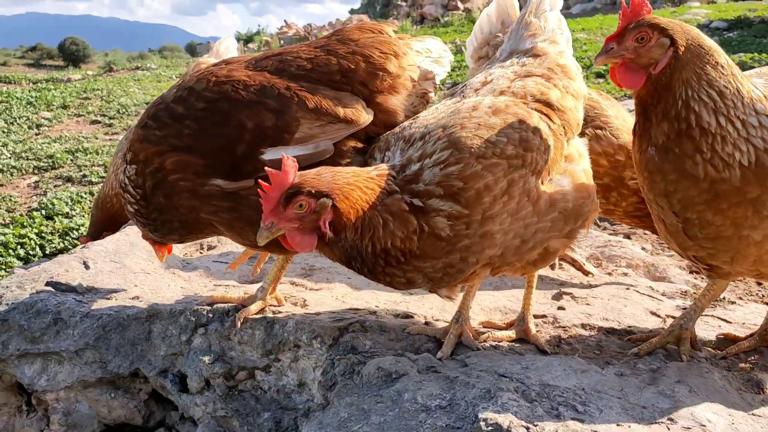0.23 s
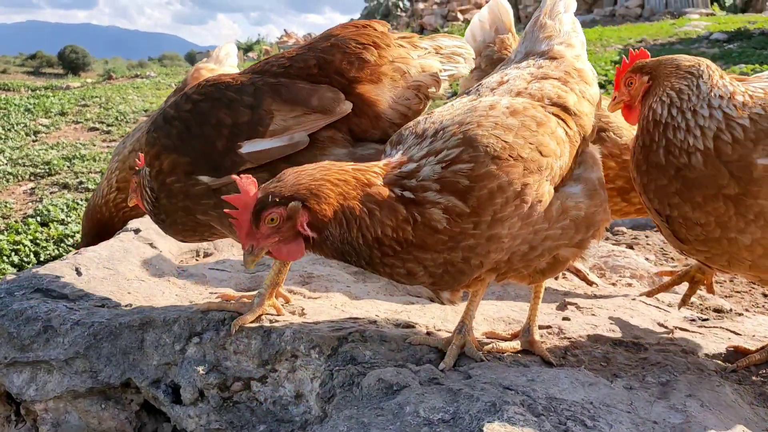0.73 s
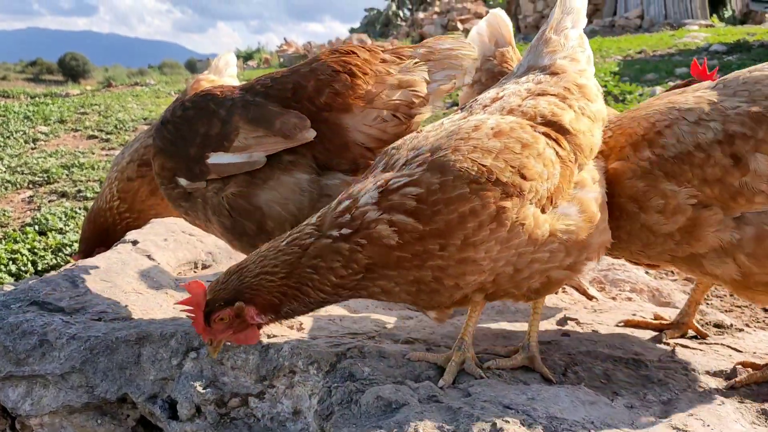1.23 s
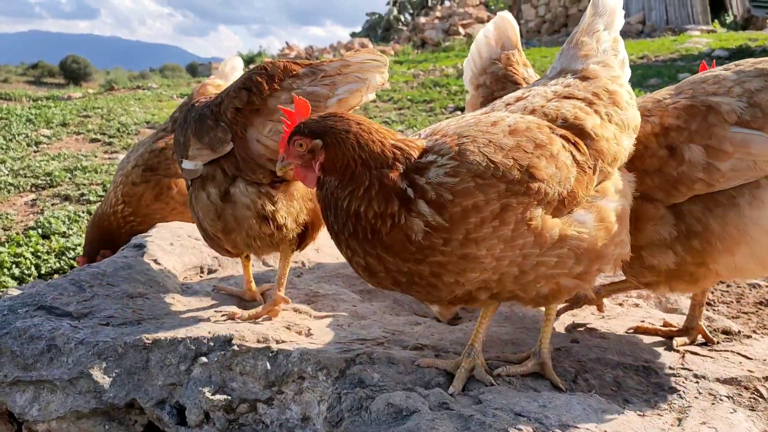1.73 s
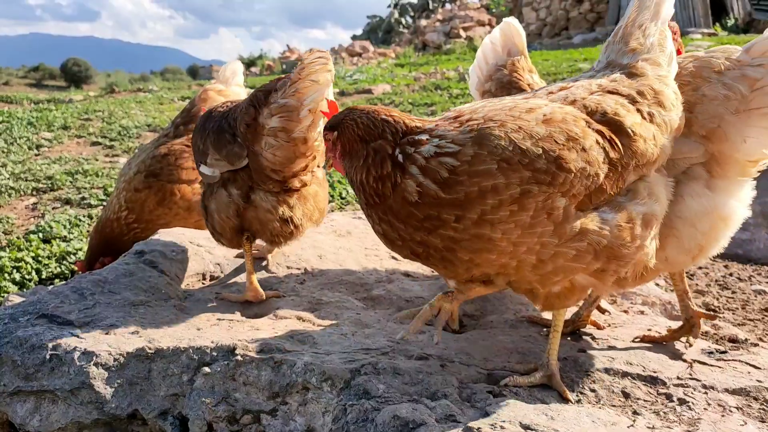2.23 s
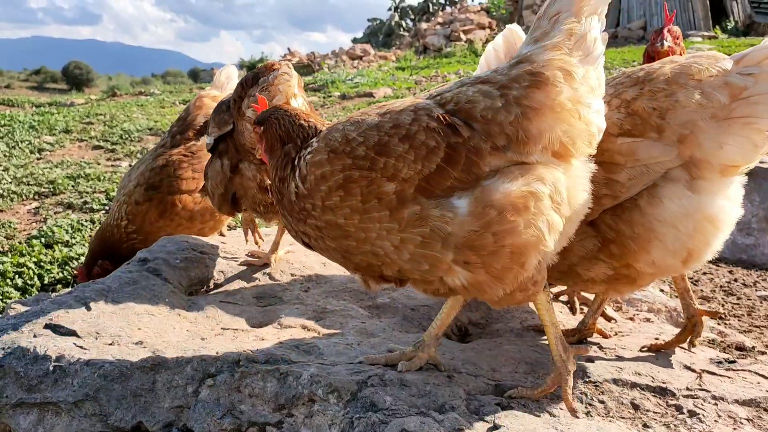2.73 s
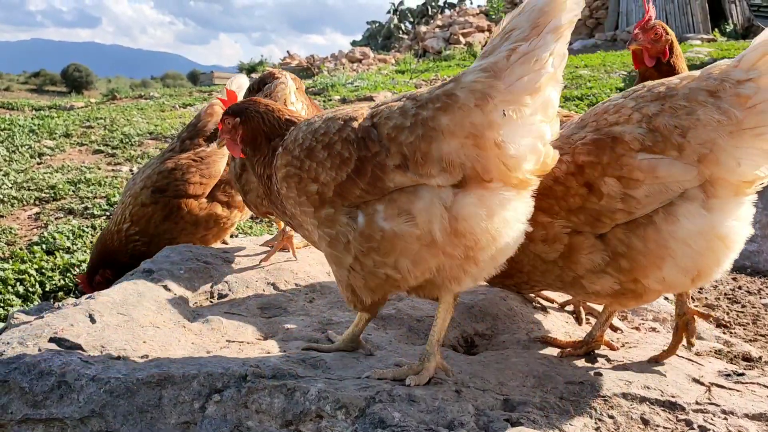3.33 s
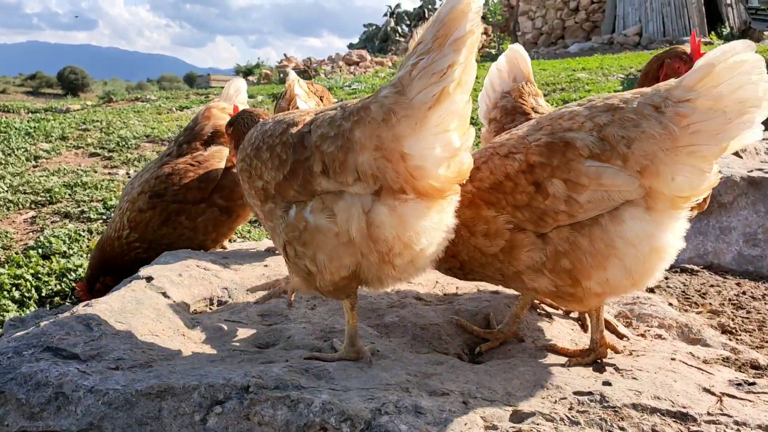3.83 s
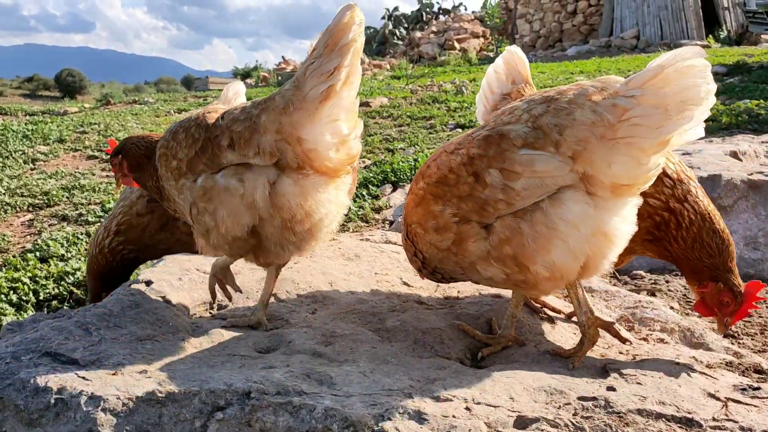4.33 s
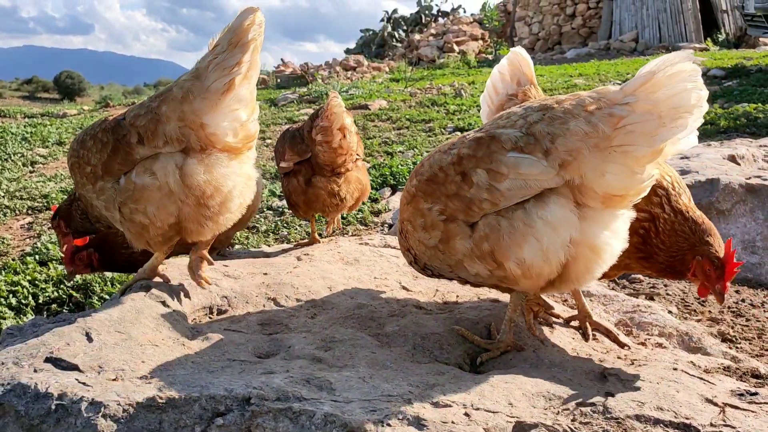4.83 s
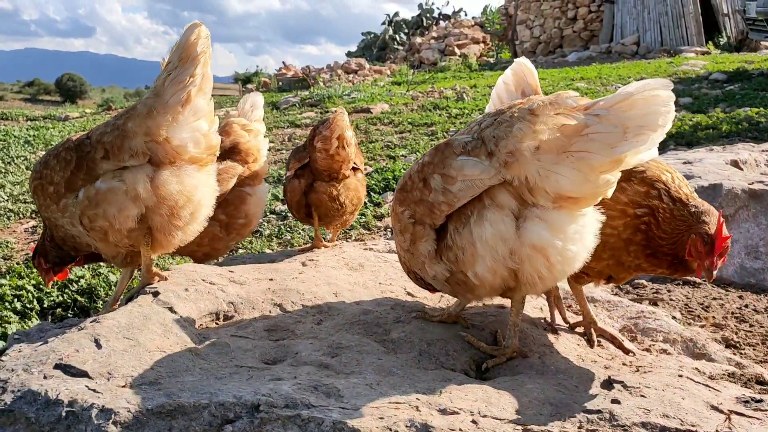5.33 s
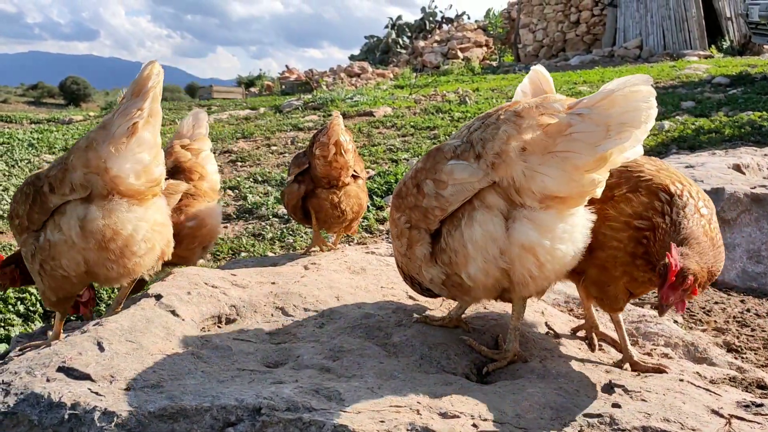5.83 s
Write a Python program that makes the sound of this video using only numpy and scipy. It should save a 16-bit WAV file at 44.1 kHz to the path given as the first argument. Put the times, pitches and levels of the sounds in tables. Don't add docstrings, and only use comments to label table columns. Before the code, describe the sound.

Brown hens moan, cluck and coo close by on bare rock, with claw ticks, low wind buffeting and thin far birdsong around them.

```python
import sys
import numpy as np
from scipy import signal
from scipy.fft import rfft, irfft, next_fast_len
from scipy.io import wavfile
from scipy.ndimage import uniform_filter1d, map_coordinates

SR = 44100
rng = np.random.default_rng(int(sys.argv[2]) if len(sys.argv) > 2 else 0)


def wav_out(sig):
    wavfile.write(sys.argv[1], SR, np.round(np.clip(np.atleast_2d(sig).T, -1, 1) * 32767).astype(np.int16))


def linear_from_db(decibels):
    return 10 ** (np.asarray(decibels, float) / 20)


N = 267687
T = np.arange(N) / SR


def unit(x):
    return x / np.sqrt(np.mean(x ** 2) + 1e-20)


def along(points, hz):
    point_hz, value = np.transpose(points)
    return np.interp(np.log(hz + 1), np.log(point_hz + 1), value)


def wobble(rate_hz, size=N):
    knots = rng.standard_normal(int(size * rate_hz / SR) + 4)
    return map_coordinates(knots, [np.arange(size) * rate_hz / SR])


def filtered(x, response):
    size = next_fast_len(x.shape[-1] + 8192)
    spectrum = rfft(x, size) * response(np.fft.rfftfreq(size, 1 / SR))
    return irfft(spectrum, size)[..., :x.shape[-1]]


def add(out, start_s, sound, pan_db):
    part = out[:, round(start_s * SR):][:, :len(sound)]
    part += linear_from_db([[pan_db / 2], [-pan_db / 2]]) * sound[:part.shape[1]]


def swell(start_s, length_s, power):
    return np.clip(1 - (2 * (T - start_s) / length_s - 1) ** power, 0, 1)


def smeared(sound, decay_s, tail_s, gap_s=0):
    t = np.arange(round(tail_s * SR)) / SR
    tail = rng.standard_normal((2, len(t))) * linear_from_db(-60 * t / decay_s) * (t >= gap_s)
    return signal.fftconvolve(sound, tail / np.linalg.norm(tail[0]), axes=1)[:, :N]


# hz [Hz], likeness [0-1]
LIKENESS = [(100, 1), (500, 0.76), (1000, 0.19), (2000, 0.24), (5000, 0.84), (9000, 0.35), (13000, 0.055)]


def rush(spectrum, patchy_db):
    z = signal.stft(rng.standard_normal((2, N)), nperseg=512)[2]
    patches = uniform_filter1d(rng.standard_normal(z.shape[1:]), size=6, axis=0)
    patches = uniform_filter1d(patches, size=10, axis=1)
    pair = signal.istft(z * linear_from_db(patchy_db * unit(patches)), nperseg=512)[1][:, :N]
    closed = [(spectrum[0][0] / 2, -90)] + list(spectrum) + [(spectrum[-1][0] * 2, -90)]

    def mid_side(hz):
        turn = np.arccos(np.clip(along(LIKENESS, hz), -1, 1)) / 2
        return linear_from_db(along(closed, hz)) * [np.cos(turn), np.sin(turn)]

    mid, side = filtered(pair, mid_side)
    return unit(np.array([mid + side, mid - side]))


# hz [Hz], level_db [dB per Hz]
AIR_SPECTRUM = [(71, -30), (120, -5), (300, -7), (500, 0), (1800, -3), (4320, -8.5), (5630, -3),
                (8640, -18.5), (15200, -13)]


def still_air():
    return linear_from_db(-72.5) * rush(AIR_SPECTRUM, patchy_db=1.4)


# hz [Hz], level_db [dB per Hz]
INSECT_SPECTRUM = [(4000, -30), (4800, -7), (5600, 0), (6300, -6), (7200, -30)]
# start_s [s], length_s [s], level_db [dB]
INSECT_SWELLS = [
    (1.877, 0.047, -65),
    (1.932, 0.029, -65),
    (1.9, 1.41, -77.5),
    (4.352, 0.13, -78),
    (5.164, 0.12, -72),
    (5.196, 0.86, -81),
]


def insects():
    level = np.full(N, linear_from_db(-81))
    for start_s, length_s, level_db in INSECT_SWELLS:
        level += linear_from_db(level_db) * swell(start_s, length_s, 4)
    return level * linear_from_db(2.5 * wobble(90)) * rush(INSECT_SPECTRUM, patchy_db=1.2) * linear_from_db([[1.6], [-1.6]])


# hz [Hz], level_db [dB per Hz]
SCRATCH_SPECTRUM = [(1300, -22), (2500, -11), (3500, 0), (4600, -3), (6000, -18)]
# hz [Hz], level_db [dB per Hz]
RUSTLE_SPECTRUM = [(2500, -24), (4500, -1.5), (7000, -2.5), (9000, -10), (15500, -4.5)]
# start_s [s], length_s [s], scratch_db [dB], rustle_db [dB]
STROKES = [(0.105, 0.13, -79, -69.5), (1.332, 0.16, -77, -84), (1.875, 0.04, -74, -95),
           (1.925, .04, -72, -95), (2.01, 0.06, -63, -82), (2.05, .09, -66, -79), (2.27, .06, -74, -90),
           (3.12, .08, -76, -95), (.255, .06, -78, -95), (.41, .05, -78, -95), (2.89, 0.34, -78.5, -94.5),
           (2.778, .07, -69.5, -83), (4.84, 0.11, -83, -78), (5.176, 0.078, -79, -81),
           (5.568, 0.039, -86, -71)]


def scuffs():
    levels = np.ones((2, N)) * linear_from_db([[-84], [-90]])
    for start_s, length_s, scratch_db, rustle_db in STROKES:
        levels += swell(start_s, length_s, 2) * linear_from_db([[scratch_db], [rustle_db]])
    scratch = levels[0] * linear_from_db(2.2 * wobble(90)) * rush(SCRATCH_SPECTRUM, patchy_db=3.0)
    rustle = levels[1] * linear_from_db(.8 * wobble(60)) * rush(RUSTLE_SPECTRUM, patchy_db=.5)
    return scratch + rustle


# hz [Hz], level_db [dB per Hz]
RUMBLE_SPECTRUM = [(8.8, -42.5), (15, -8), (38, 0), (59, 2.5), (129, -15), (161, -25), (270, -30),
                   (570, -120)]
# peak_s [s], peak_db [dB], ebb_db_per_s [dB/s]
GUST_PEAKS = [(0.04, -49, 250), (.17, -67, 100), (.37, -70, 150), (.6, -76, 20), (.84, -75, 100),
              (1.06, -74, 60), (1.23, -72, 100), (1.405, -50, 200), (1.49, -60, 80), (1.6, -53, 50),
              (1.73, -57, 150), (1.83, -57, 120), (2.0, -64, 80), (2.17, -63, 90), (2.49, -53, 150),
              (2.7, -62, 100), (2.85, -59, 80), (2.96, -65, 300), (3.15, -63, 50), (3.31, -63, 100),
              (3.4, -58, 200), (3.55, -67, 100), (3.77, -68, 30), (3.96, -68, 60), (4.07, -62, 100),
              (4.12, -59, 300), (4.31, -69, 100), (4.7, -70, 150), (4.92, -67, 100), (5.19, -73, 200),
              (5.36, -72, 100), (5.46, -62, 90), (5.58, -64, 70), (5.85, -72, 60), (5.99, -72, 150)]


def wind():
    rise_db_per_s, lull_db, steady_s = 330, -88, .05
    gusts_db = np.full(N, -np.inf)
    for peak_s, peak_db, ebb_db_per_s in GUST_PEAKS:
        loss_db = np.where(T < peak_s, rise_db_per_s * (peak_s - T), ebb_db_per_s * (T - peak_s))
        gusts_db = np.maximum(gusts_db, peak_db - loss_db)
    buffet = rush(RUMBLE_SPECTRUM, patchy_db=1.0)
    power = uniform_filter1d(buffet.mean(0) ** 2, size=round(steady_s * SR))
    strength = np.sqrt(np.abs(power) + .05)
    lumps = unit(linear_from_db(2.2 * wobble(14)) * buffet / strength ** .7)
    return (linear_from_db(gusts_db - 1.5) + linear_from_db(lull_db)) * lumps


# hz [Hz], level_db [dB]
KNOCK_SPECTRUM = [(330, -49), (480, 4), (750, -2.5), (1130, -14.5), (1300, -50)]


def knock():
    impulse = np.zeros(N)
    impulse[round(.02 * SR)] = 1
    sound = filtered(impulse, lambda hz: linear_from_db(along(KNOCK_SPECTRUM, hz)))
    return np.tile(linear_from_db(-31.5) * sound / sound.max(), (2, 1))


# start_s [s], peak_db [dB], low_part_db [dB]
CLAW_TICKS = [(0.2037, -53.5, 1), (0.972, -59.5, -43), (1.3936, -55.5, -8), (1.6334, -55, 7),
              (1.7984, -60.5, -9), (2.6842, -55.5, -2), (2.801, -43.5, -6), (2.8138, -46.5, -7),
              (2.829, -46.5, -9), (2.8575, -55, 6), (4.8876, -61.5, -22), (4.9252, -52.5, -13),
              (5.1866, -56.5, -6), (5.1953, -54, -20), (5.2053, -58, -20), (5.217, -55, -15),
              (2.637, -60, 5), (5.6082, -62, -8)]


def claws():
    out, t = np.zeros((2, N)), np.arange(SR // 20) / SR
    for start_s, peak_db, low_db in CLAW_TICKS:
        noise = rng.standard_normal(len(t)) * linear_from_db(-60 * t / 0.0087)
        colour = [(1200, low_db - 1.0), (3500, low_db + 4), (5500, 13), (9000, -5), (15000, -18.0)]
        crack = filtered(noise, lambda hz: linear_from_db(along(colour, hz)))
        add(out, start_s, linear_from_db(peak_db + 3.5) * crack / np.abs(crack).max(), pan_db=6.0 + 2 * rng.normal())
    return out


# start_s [s], peak_db [dB], top_hz [Hz]
FOOTFALLS = [
    (4.894, -60, 328),
    (4.908, -58, 240),
    (4.928, -61, 298),
    (4.99, -65, 300),
    (2.49, -60, 260),
    (4.455, -68, 600),
    (5.206, -55.5, 1120),
    (5.555, -65, 1300),
    (5.94, -60.5, 880),
]


def footfalls():
    out, t = np.zeros((2, N)), np.arange(SR // 20) / SR
    for start_s, peak_db, top_hz in FOOTFALLS:
        noise = rng.standard_normal(len(t)) * linear_from_db(-60 * t / .05)
        thud = signal.sosfilt(signal.butter(3, top_hz, fs=SR, output="sos"), noise)
        add(out, start_s - .006, linear_from_db(peak_db) * thud / np.abs(thud).max(), pan_db=1.0)
    return out


def note(length_s, first_hz, middle_hz, last_hz, overtone_db, rough, flutter_hz):
    u = np.linspace(-1, 1, round(length_s * SR))
    bend_hz = (first_hz + last_hz) / 2 - middle_hz
    pitch_hz = middle_hz + (last_hz - first_hz) / 2 * u + bend_hz * u * u
    trill = np.sin(np.pi * flutter_hz * length_s * u)
    unsteady = 1 + rough * (0.032 * trill + .035 * wobble(270, size=len(u)))
    phase = 2 * np.pi * np.cumsum(pitch_hz * unsteady) / SR
    overtone = linear_from_db(overtone_db) * np.exp(-(pitch_hz / 620) ** 8) * np.sin(2 * phase)
    return (1 - u ** 4) * (1 - 0.68 * rough * trill) * (np.sin(phase) + overtone)


# start_s [s], length_s [s], middle_hz [Hz], level_db [dB]
FALLING = [(2.432, .028, 2000, -67), (2.378, .015, 2950, -74), (2.385, .014, 1950, -70),
           (2.506, .011, 2950, -69), (2.72, .012, 2800, -70), (0.523, .03, 2400, -70),
           (.293, .028, 2100, -76), (.353, .014, 2450, -73), (.374, .024, 3050, -71),
           (.024, .02, 2800, -74), (.51, .07, 1800, -79), (3.812, .02, 2950, -79), (3.716, .01, 4200, -75),
           (5.528, .022, 5000, -69), (5.532, .012, 5700, -69), (5.677, .014, 3750, -75),
           (5.724, .009, 5700, -58), (5.7, .012, 5500, -64), (2.834, 0.034, 3340, -57),
           (2.87, 0.037, 2400, -63), (2.979, 0.03, 1970, -67.5), (3.235, 0.024, 1950, -72),
           (3.41, .03, 3300, -65), (3.668, .03, 3500, -72), (4.83, 0.019, 3670, -67.5),
           (4.978, 0.012, 3780, -73), (5.426, 0.017, 2600, -58), (5.504, .012, 5950, -62.5),
           (5.615, 0.0153, 2515, -56.5), (5.689, 0.013, 5950, -57), (5.807, 0.014, 2580, -61),
           (5.902, 0.044, 5680, -57.5), (2.742, .058, 4000, -63)]
# start_s [s], length_s [s], middle_hz [Hz], end_drop [share], level_db [dB]
ARCHED = [
    (0.441, 0.058, 5990, .1, -64.5),
    (.652, 0.049, 6170, .08, -61),
    (.846, 0.042, 6240, 0.11, -61.5),
    (.255, .03, 2700, .1, -74),
    (5.927, 0.078, 2630, 0.053, -67.5),
    (5.66, .065, 4830, -0.06, -65),
]
# start_s [s], length_s [s], middle_hz [Hz], level_db [dB]
RISING = [(.275, .03, 3000, -73), (.44, .025, 3750, -74), (3.12, .03, 3450, -75), (3.528, .014, 1800, -73),
          (3.54, .02, 2400, -76), (5.205, .045, 2520, -75), (3.026, .016, 2100, -68),
          (1.802, 0.046, 2990, -67.5), (2.56, .075, 3650, -73), (2.705, .042, 4330, -65),
          (3.036, .032, 2530, -64), (3.277, 0.023, 2310, -68.5), (3.375, 0.022, 3650, -65),
          (3.64, .03, 3750, -73), (3.799, 0.037, 2470, -70)]
# start_s [s], length_s [s], middle_hz [Hz], level_db [dB]
HELD = [(2.46, .04, 2450, -72), (2.53, .05, 2500, -74), (2.47, .06, 1750, -74), (.26, .1, 2600, -77),
        (.398, .034, 1900, -77), (.345, .035, 3250, -72), (.39, .04, 3080, -78), (.99, .06, 1780, -76),
        (3.85, .03, 3500, -76), (5.505, .018, 4900, -69), (5.558, .03, 4700, -67), (5.31, .03, 5900, -71),
        (5.783, .014, 1600, -73), (1.0, .09, 1480, -77), (.439, .13, 3495, -74), (.655, 0.045, 4060, -70),
        (.85, 0.039, 4080, -70.5), (1.83, 0.11, 2464, -70.5), (4.767, 0.1, 2500, -74.5),
        (4.95, 0.05, 2220, -70), (5.255, .069, 2670, -67), (5.325, .13, 2184, -75.5),
        (4.156, .13, 2984, -79.5), (5.821, 0.07, 2400, -77), (6.012, 0.088, 2100, -78),
        (5.88, .06, 2550, -76), (4.8, 0.18, 1880, -78.5)]


def whistles():
    out = np.zeros((2, N))

    def chirp(start_s, length_s, hz, level_db, before, after):
        sound = note(length_s, hz * (1 + before), hz, hz * (1 + after), overtone_db=-42, rough=.3, flutter_hz=130)
        level = linear_from_db(level_db + 2.5 * wobble(50, size=len(sound)))
        add(out, start_s, level * sound, pan_db=4.5 + 2 * rng.normal())

    for row in FALLING:
        fall = min(6.4 * row[1], 0.181)
        chirp(*row, 1.35 * fall, -.7 * fall)
    for start_s, length_s, middle_hz, end_drop, level_db in ARCHED:
        chirp(start_s, length_s, middle_hz, level_db, -1.25 * end_drop, -.75 * end_drop)
    for row in RISING:
        chirp(*row, -.14, .06)
    for row in HELD:
        chirp(*row, .015, -.015)
    return out


# start_s [s], length_s [s], top_hz [Hz], end_drop [share], level_db [dB]
HOARSE = [(4.37, .11, 5550, .01, -80), (.8, .2, 1750, .03, -83), (.9, .22, 1500, .02, -83),
          (4.85, .11, 2300, .03, -84), (1.1, .23, 2470, .01, -77), (1.26, .085, 2250, .03, -79),
          (1.4, .065, 1900, .04, -76), (1.393, 0.11, 2450, .2, -67.5), (1.596, 0.096, 2780, .28, -80.5),
          (2.162, 0.11, 2500, .28, -75), (2.19, .045, 2900, .1, -78), (2.362, 0.08, 2350, 0.06, -72.5),
          (2.578, .09, 3010, 0.036, -76)]


def rasps():
    out = np.zeros((2, N))
    for start_s, length_s, top_hz, end_drop, level_db in HOARSE:
        end_hz = top_hz * (1 - end_drop)
        rasp = note(length_s, end_hz, top_hz, end_hz, overtone_db=-43, rough=.72, flutter_hz=61.2)
        add(out, start_s, linear_from_db(level_db + 7.5) * rasp, pan_db=3.0 + 2 * rng.normal())
    return out


def birds():
    out = whistles() + rasps()
    return out + linear_from_db(-6.5) * smeared(out, decay_s=.3, tail_s=.25)


# start_s [s], length_s [s], pitch_hz [Hz], start_above [share], level_db [dB]
CLUCK_NOTES = [(0.608, 0.017, 543, 0.2, -60), (0.768, 0.011, 590, -0.2, -66.5),
               (2.157, 0.042, 636, 0.0035, -62), (3.85, 0.045, 520, .001, -81), (3.99, .09, 1120, .01, -86),
               (4.48, .12, 500, .02, -86), (5.936, 0.0186, 504, 0.066, -65.5),
               (5.974, 0.03, 550, 0.58, -53), (0.035, .17, 721, .03, -81), (.12, .11, 965, .01, -83),
               (.03, .03, 480, .01, -76)]


def clucks():
    out = np.zeros((2, N))
    for start_s, length_s, hz, above, level_db in CLUCK_NOTES:
        last_hz = hz * (1 - np.clip(above, -.07, .07))
        cluck = note(length_s, hz * (1 + above), hz, last_hz, overtone_db=-13, rough=0.045, flutter_hz=60)
        add(out, start_s, linear_from_db(level_db + 6.0) * cluck, pan_db=2.0)
    return out


def breathed(rows):
    attack_s, attack_db, release_s, release_db, sag = .016, 20, 0.011, 25, .95
    rows = np.array(rows)
    head, tail = rows[0].copy(), rows[-1].copy()
    head[:3] -= [attack_s, 0, attack_db]
    tail[:3] = tail[0] + release_s, tail[1] * sag, tail[2] - release_db
    return np.vstack([head, rows, tail]).T


# centre_s [s], pitch_shift [share]
VOICE_BREAKS = [
    (1.31, .03),
    (1.49, .05),
    (1.55, -.04),
]


def voice(s, hz, waver, levels_db):
    shimmer_db, edge_s, break_s = 1.3, 0.006, .014
    t = np.arange(s[0], s[-1], 1 / SR)
    slow, fast = wobble(59.36, size=len(t)), wobble(180, size=len(t))
    pitch_hz = np.interp(t, s, hz) * (1 + waver * slow + 1.13 * waver * fast)
    flips = sum(shift * np.exp(-((t - centre_s) / break_s) ** 2) for centre_s, shift in VOICE_BREAKS)
    phase = 2 * np.pi * np.cumsum(pitch_hz * (1 + flips)) / SR
    gate = np.clip(np.minimum(t - t[0], t[-1] - t) / edge_s, 0, 1)
    out = np.zeros(len(t))
    for k, level_db in enumerate(levels_db):
        level = linear_from_db(np.interp(t, s, level_db) + shimmer_db * wobble(70, size=len(t)))
        out += level * np.sin((k + 1) * phase + k)
    return np.sqrt(2) * gate * out


# time_s [s], pitch_hz [Hz], level_db [dB]
COO_CALLS = [
    [(0.19, 495, -69), (.24, 492, -68), (.259, 490, -80), (.272, 495, -69), (0.31, 493, -72),
     (0.41, 478, -75.5)],
    [(2.455, 642, -57), (2.47, 645, -55.5), (2.52, 642, -59.5), (2.545, 624, -55), (2.6, 652, -56),
     (2.645, 656, -50.5), (2.667, 624, -50)],
    [(2.83, 636, -55), (2.92, 655.5, -53), (3.05, 655, -56.5), (3.141, 652, -51.5), (3.152, 620, -51)],
    [(3.299, 809, -54.5), (3.311, 657, -55.5), (3.331, 674, -53.5), (3.465, 646.5, -48.5),
     (3.483, 652, -51)],
    [(3.642, 820, -60.5), (3.654, 642, -55.5), (3.665, 633, -46.5), (3.694, 677, -64.5),
     (3.718, 632, -60.5), (3.732, 658, -53), (3.746, 604, -60), (3.77, 700, -69)],
]
# pan_db [dB], waver [share]
COO_VOICING = [(0, 0.011), (-5.5, 0.0086), (-3.5, 0.0068), (-5.5, 0.011), (3.5, .032)]


def coos():
    out = np.zeros((2, N))
    for rows, (pan_db, waver) in zip(COO_CALLS, COO_VOICING):
        s, hz, first_db = breathed(rows)
        add(out, s[0], voice(s, hz, waver, [first_db, first_db - 28.5]), pan_db)
    return out


# time_s [s], pitch_hz [Hz], level_db [dB], beak_db [dB]
RISING_MOAN = [(1.034, 530, -47, -11.5), (1.059, 502.6, -47, -13), (1.18, 506, -47, -0.6),
               (1.21, 513, -47, -11), (1.275, 532, -46.5, -12), (1.305, 577, -47, -3),
               (1.445, 592, -41.5, -1.5), (1.497, 690, -48.5, -5.5), (1.606, 782, -41, -0.5)]
# time_s [s], pitch_hz [Hz], level_db [dB]
DRONE_CALLS = [
    [(1.695, 468.8, -56), (1.72, 451, -50), (1.845, 445.6, -52.5), (1.87, 412, -65), (1.905, 440, -59),
     (1.92, 483.4, -52), (1.973, 497, -48.5), (1.99, 480, -50.5)],
    [(2.026, 509.6, -52), (2.06, 554.5, -46), (2.11, 565.6, -51), (2.135, 510.4, -51.5), (2.2, 493, -53.5),
     (2.225, 522.7, -58), (2.265, 507.6, -53), (2.33, 512, -50.5)],
    [(2.365, 525.4, -57.5), (2.397, 506, -51), (2.42, 585, -56.5), (2.461, 551, -55.5), (2.48, 588, -56.5),
     (2.51, 574, -53), (2.53, 611, -64), (2.543, 510, -56.5)],
]
# time_s [s], pitch_hz [Hz], level_db [dB]
SINKING_CALLS = [
    [(2.732, 533, -50), (2.75, 528, -50), (2.77, 529.6, -54), (2.79, 544, -57), (2.815, 515, -58.5),
     (2.85, 541, -54.5), (2.875, 526, -53), (2.905, 572, -58)],
    [(2.925, 552, -52), (2.94, 516, -55), (3.003, 498, -51.5), (3.022, 450, -51.5)],
]
# time_s [s], pitch_hz [Hz], level_db [dB]
OUTBURSTS = [
    [(1.72, 519, -46.5), (1.73, 580, -37.5), (1.742, 673, -45)],
    [(1.748, 820, -40), (1.76, 798, -41), (1.78, 724, -44), (1.792, 815, -40), (1.83, 785.5, -39),
     (1.848, 687, -43), (1.86, 839, -41)],
    [(2.002, 540.5, -42.5), (2.018, 562.5, -38.5), (2.044, 607, -36), (2.07, 626, -40.5),
     (2.088, 629, -44.5)],
    [(2.284, 526, -38.5), (2.3, 553, -38), (2.326, 592, -39)],
]
# pan_db [dB], waver [share], strain_db [dB], beak_db [dB]
MOAN_VOICING = [(-0.2, 0.007, -33, -0.5), (1.5, 0.016, -32.5, -1.5), (2.2, .014, -36.5, -0.3),
                (3, .02, -28, .1), (4, .014, -35, 2.5), (2.5, .014, -40, -4.5), (.6, 0.011, -29, -3),
                (1.3, 0.014, -23, -0.7), (1.5, 0.0085, -22, -1.5), (1.3, 0.0075, -34, 5)]
# second_partial_hz [Hz], gain_db [dB]
THROAT_GAIN = [(850, 4), (1040, 6.5), (1110, -0.5), (1180, -9), (1400, -10.5), (1600, -17)]


def moans():
    out = np.zeros((2, N))
    calls = [RISING_MOAN] + DRONE_CALLS + SINKING_CALLS + OUTBURSTS
    for rows, (pan_db, waver, strain_db, beak_db) in zip(calls, MOAN_VOICING):
        s, hz, first_db, *opening_db = breathed(rows)
        second_db = first_db + along(THROAT_GAIN, 2 * hz) + beak_db + sum(opening_db)
        upper_db = [second_db + strain_db + step_db for step_db in (0, -5, -11)]
        add(out, s[0], voice(s, hz, waver, [first_db, second_db] + upper_db), pan_db)
    return out


# hz [Hz], side_db [dB]
PORT_SIDE = [(470, -9), (620, 0)]
# hz [Hz], lead_rad [rad]
PORT_LEAD = [(690, -.1), (1030, .55), (1290, .2), (1640, 1), (1890, -.6)]


def hens():
    out = clucks() + coos() + moans()
    mid = out.mean(0)
    echo = smeared(mid[None], decay_s=.16, tail_s=.125, gap_s=.008)
    slap = linear_from_db(-25) * np.roll(out[::-1], round(.05 * SR), axis=1)
    side = filtered(out[0] - out[1], lambda hz: linear_from_db(along(PORT_SIDE, hz))) / 2
    ports = mid + np.outer([1, -1], side)
    near = filtered(ports, lambda hz: np.exp(.5j * np.outer([1, -1], along(PORT_LEAD, hz))))
    return near + slap + linear_from_db(-13.5) * echo


# hz [Hz], level_db [dB per Hz]
FLOCK_SPECTRUM = [(1150, -12), (1650, -7.5), (1950, -11)]
# start_s [s], length_s [s], level_db [dB]
FLOCK_CALLS = [
    (0.74, 0.4, -72.5),
    (2.86, 0.42, -73),
    (.5, .15, -77),
]


def far_flock():
    level = np.zeros(N)
    for start_s, length_s, level_db in FLOCK_CALLS:
        level += linear_from_db(level_db) * np.sin(np.pi * np.clip((T - start_s) / length_s, 0, 1))
    return level * rush(FLOCK_SPECTRUM, patchy_db=2)


def scene():
    ground = scuffs() + knock() + claws() + footfalls()
    return still_air() + insects() + wind() + ground + birds() + hens() + far_flock()


def band_limit(x):
    return signal.sosfilt(signal.butter(12, 16270, fs=SR, output="sos"), x)


def record(dry):
    return band_limit(filtered(dry, lambda hz: hz < 15480))


dry = scene()
out = record(dry)
wav_out(out)
```